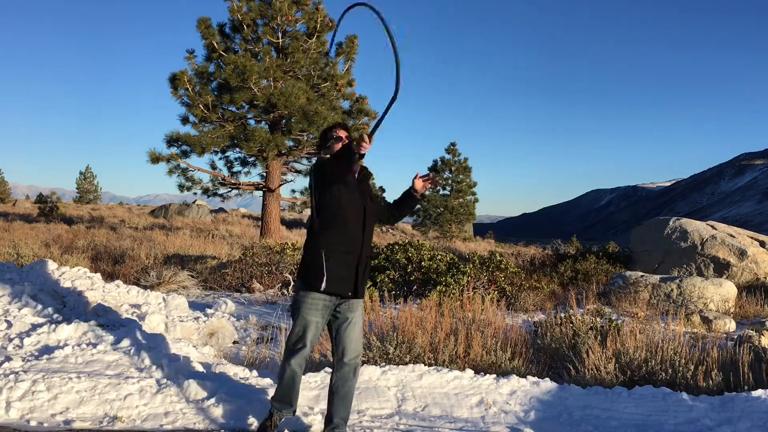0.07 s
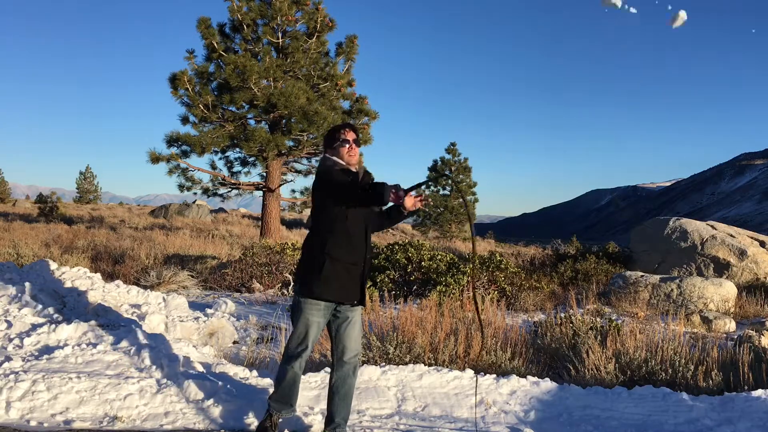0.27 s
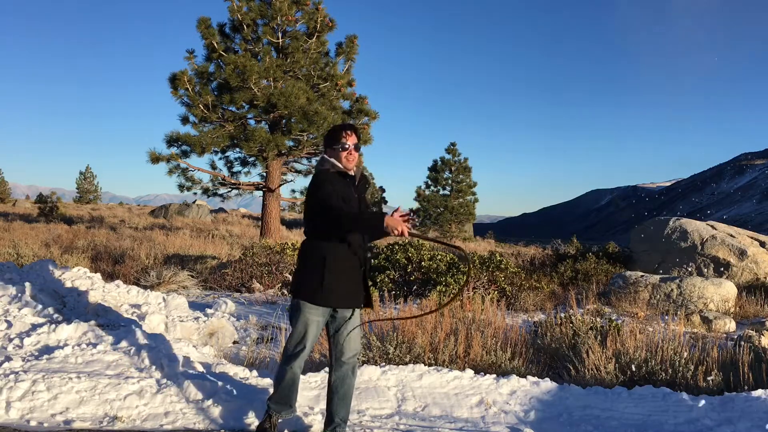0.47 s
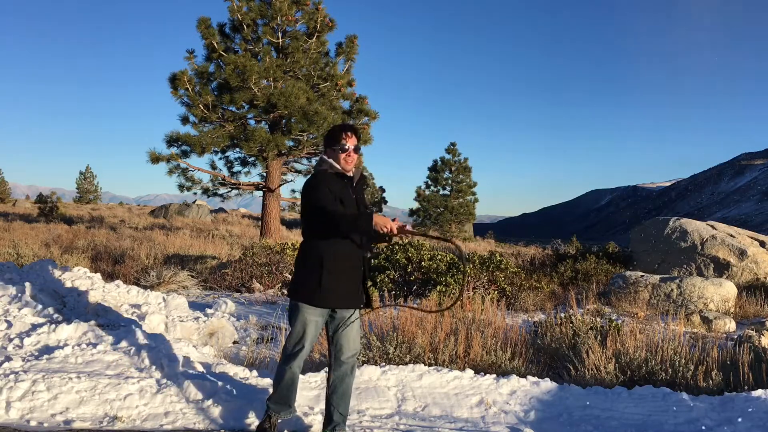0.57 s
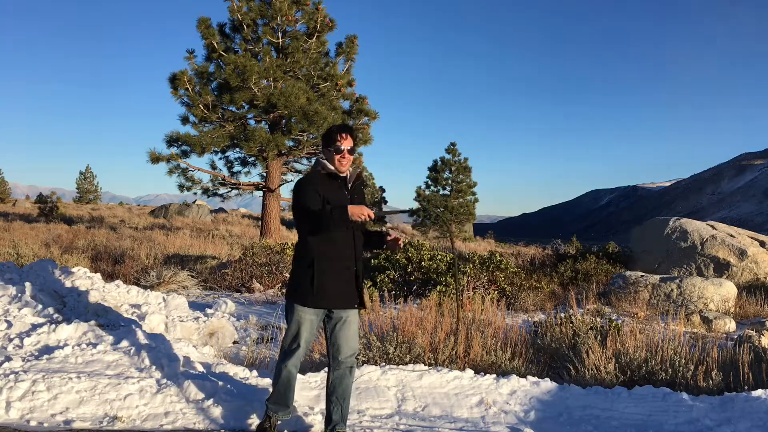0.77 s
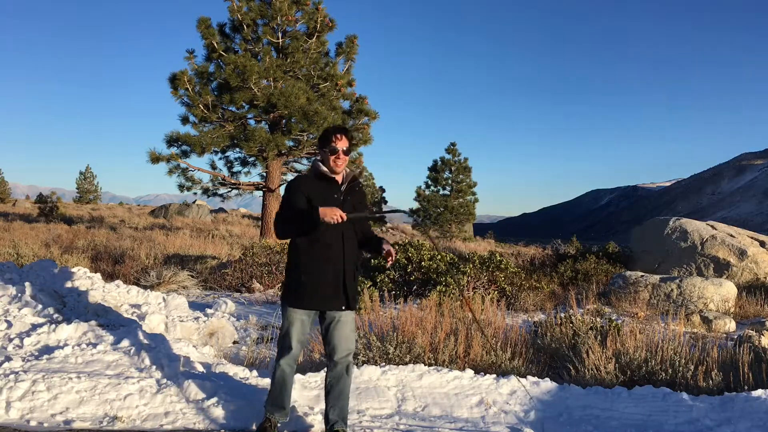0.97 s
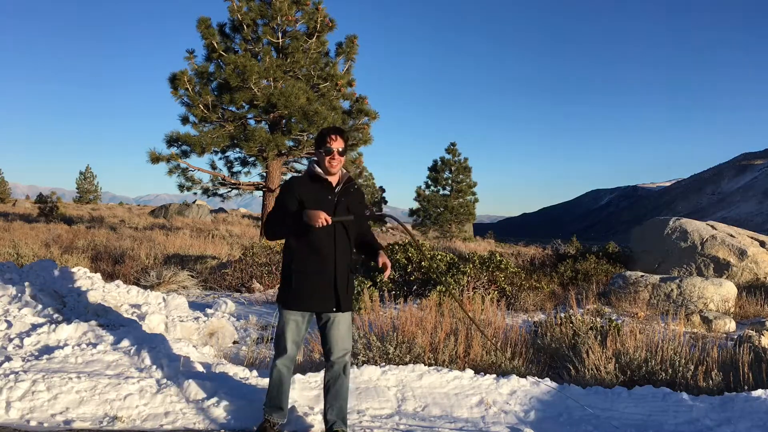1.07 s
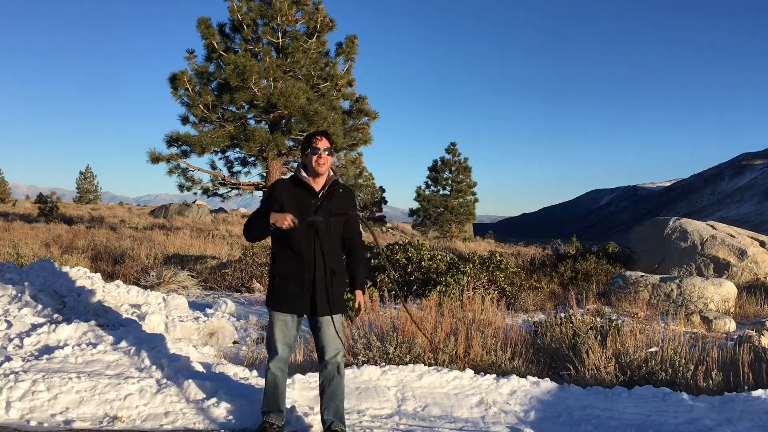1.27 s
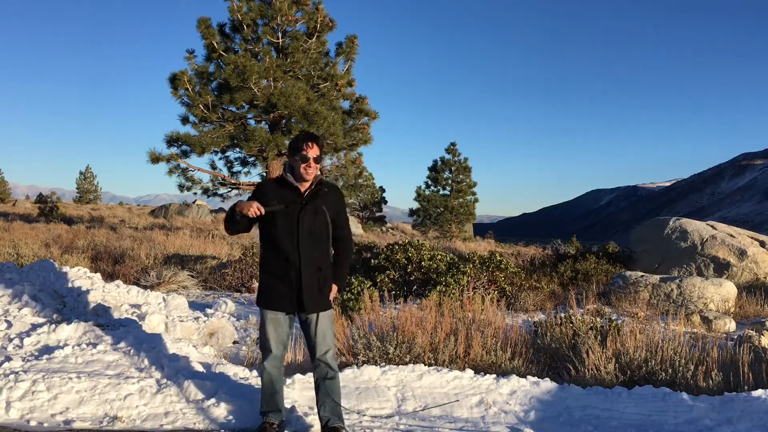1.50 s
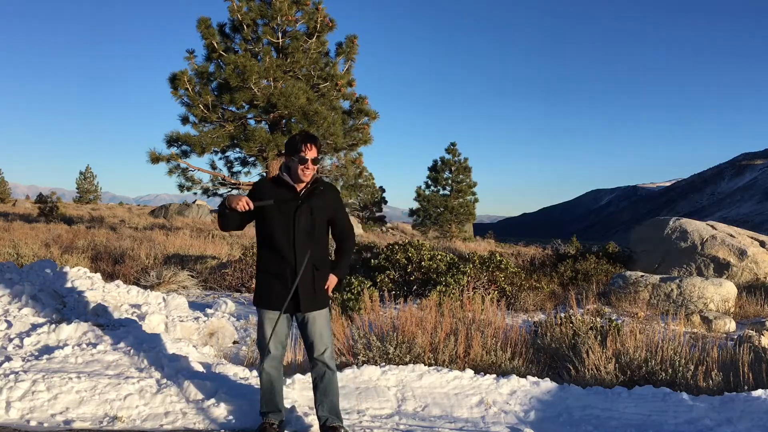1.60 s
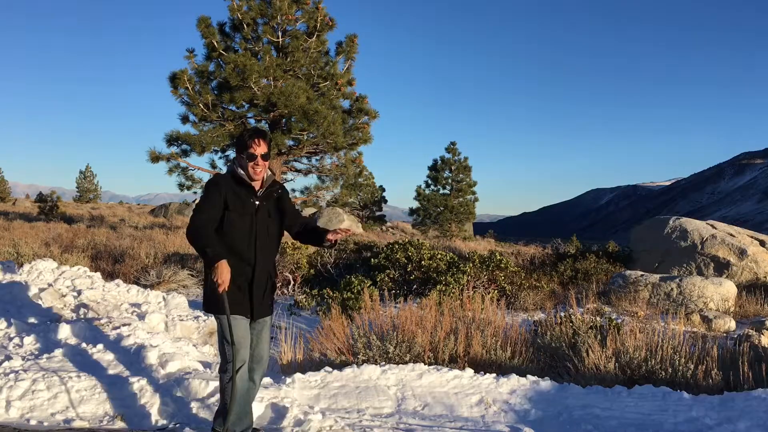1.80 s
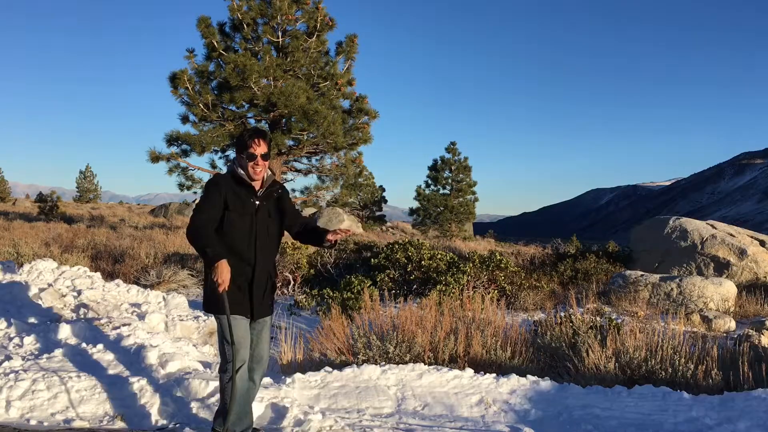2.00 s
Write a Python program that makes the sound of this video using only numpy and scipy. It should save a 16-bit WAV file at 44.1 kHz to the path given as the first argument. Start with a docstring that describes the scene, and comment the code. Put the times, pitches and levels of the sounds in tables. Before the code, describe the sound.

A whip swishes and gives one sharp, loud crack close to the microphone. The slack cord then taps and brushes lightly against a coat and the snowy ground, over faint outdoor hiss and wind rumble.

```python
"""Open snowy country, one microphone close to a whip, wind rumble and hiss throughout. The swung cord sheds
vortices and whistles upward; at 0.22 s it cracks in two quick pressure swings, echoed a few milliseconds later,
then whistles down as the tip slows. The slack cord taps and brushes coat and ground, hardest near 1.7 s. At
1.84 s the sound dips to silence and returns muffled, with low thumps."""
import sys
import numpy as np
from scipy import signal
from scipy.io import wavfile
from scipy.ndimage import map_coordinates

SR = 44100
rng = np.random.default_rng(int(sys.argv[2]) if len(sys.argv) > 2 else 0)


def to_wav(s):
    """Save 16-bit WAV."""
    ch = np.atleast_2d(s).T  # columns
    pcm = np.round(np.clip(ch, -1, 1) * 32767)  # PCM
    wavfile.write(sys.argv[1], SR, pcm.astype(np.int16))


N = 90404

# pressure swings of the crack, the last one its echo, one cycle each: start_s, length_ms, level_db,
# fade_over_cycle_db
CRACK_SHOCKS = [(.2218, .85, -11, -3), (.2227, 2.9, -7.5, 3), (.2277, 3.6, -9, 20)]
# low thud of air around the crack: time_s, level_db
THUD_LEVEL = [(.203, -60.5), (.21, -44), (.22, -43), (.229, -27.5), (.24, -37.5), (.246, -47), (.252, -40),
              (.262, -53), (.33, -70)]
# turbulent rush of the cord: time_s, level_db
RUSH_LEVEL = [(.05, -96), (.095, -72), (.125, -57.5), (.165, -69), (.2, -63), (.213, -46), (.2175, -44),
              (.2195, -24.5), (.2222, -19), (.226, -17), (.231, -25), (.236, -36.5), (.27, -50), (.31, -57),
              (.345, -66), (.38, -56), (.43, -65.5), (.6, -67), (.632, -55.5), (.645, -99)]
# its spectrum: frequency_hz, relative_density_db
RUSH_SPECTRUM = [(880, -42), (1500, -14), (2390, -0.5), (2640, -5.5), (3880, -10.5), (5220, -7.5),
                 (9650, -13.5), (16000, -19)]
# whistle of the wind-up swing: time_s, pitch_hz, relative_db
WINDUP_WHISTLE = [(.02, 484.6, -82), (.045, 529.4, -69), (.075, 571.6, -73.5), (.1, 728, -64),
                  (.118, 800, -56.5), (.135, 843, -54.5), (.155, 796, -55.5), (.165, 806, -68.5),
                  (.18, 755, -58), (.2, 626, -62)]
# whistle as the loop runs down the thinning cord: time_s, pitch_hz, relative_db
THROW_WHISTLE = [(.18, 170, -64), (.192, 240, -44), (.199, 290, -43), (.203, 450, -60), (.2065, 800, -41),
                 (.2125, 950, -42), (.2145, 1500, -36), (.217, 1850, -28), (.2185, 2400, -36),
                 (.2195, 3760, -21), (.2212, 3766, -38), (.2243, 4053, -17), (.2262, 3900, -33),
                 (.228, 3800, -28), (.233, 3500, -35), (.237, 3300, -52)]
# whistle as the tip slows after the crack: time_s, pitch_hz, relative_db
RECOIL_WHISTLE = [(.222, 2200, -43), (.228, 2300, -30), (.234, 2200, -39), (.237, 1950, -29),
                  (.241, 2100, -26), (.246, 1600, -32), (.251, 1300, -37), (.253, 1500, -46),
                  (.257, 1550, -38), (.27, 950, -46), (.28, 1000, -51), (.295, 795, -53), (.322, 722, -57),
                  (.332, 627, -76), (.35, 531, -58), (.37, 490, -72)]
# slack cord landing, relative levels in four registers: start_s, knock_db, thud_db, tick_db, fizz_db
CORD_TAPS = [(0.3543, -46, -55, -36, -51), (0.37, -58, -76, -44, -66), (0.379, -53.5, -64, -43, -76),
             (0.406, -64, -85, -53, -51), (.506, -78, -83, -66, -60), (0.599, -38, -47.5, -34.5, -51.5),
             (0.6024, -32, -41.5, -30.5, -60.5), (0.619, -41.5, -47, -44, -73), (0.629, -45, -51, -44, -77),
             (0.6528, -47, -64, -46, -54), (.658, -47.5, -60, -48, -60), (0.662, -57, -68, -62, -58),
             (0.6917, -49.5, -58.5, -49.5, -72), (0.7023, -60, -64, -66, -62),
             (0.8064, -62, -59.5, -46.5, -70), (0.85, -47.5, -63, -73, -82),
             (0.868, -67.5, -69, -59.5, -67), (1.039, -61, -70.5, -70, -65.5),
             (1.141, -54, -76, -54.5, -54.5), (1.2291, -46.5, -57.5, -46.5, -76.5),
             (1.2883, -41, -56.5, -49, -78), (1.327, -44.5, -56, -54.5, -69),
             (1.3978, -78, -77, -42.5, -68), (1.6731, -18.5, -36, -33.5, -55), (1.6789, -28, -42, -39, -67),
             (1.6845, -34, -57.5, -40, -61), (1.694, -40, -64, -46, -55.5), (1.697, -26.5, -48, -38, -55),
             (1.705, -43, -79, -44, -72), (1.7329, -53, -78, -46, -47.5), (1.7474, -65, -85, -42.5, -60),
             (1.9, -49.5, -55, -59, -95)]
# registers of a tap, in that order: low_hz, high_hz
REGISTER_BANDS = [(760, 1450), (170, 560), (2100, 4400), (4800, 14000)]
# how each register is struck: t60_s, gain_db, noise_share
REGISTER_STRIKES = [(0.015, 19, 0.42), (0.057, 31, 0.26), (0.015, 13.5, 0.81), (0.02, 21.5, 0.7)]
# soft low knocks: start_s, pitch_hz, level_db
LOW_THUMPS = [(1.863, 55, -41), (1.92, 50, -43), (1.94, 65, -41), (1.341, 150, -45)]
# spectrum of the outdoor hiss: frequency_hz, relative_density_db
HISS_SPECTRUM = [(18, -31), (30, -3), (64, -7), (404, -19.5), (449, -21), (1070, -23), (2170, -27),
                 (2900, -32.5), (3980, -32.5), (13000, -41), (16000, -45.5)]
# lower hiss and rustle: time_s, level_db
LOW_HISS_LEVEL = [(0, -64), (.14, -64), (.3, -60), (.56, -61.5), (.7, -65.5), (1.06, -67.5), (1.29, -63),
                  (1.4, -66), (1.65, -65.5), (1.72, -60), (1.82, -60), (1.85, -66), (1.91, -62.5),
                  (1.97, -68), (2.05, -68.5)]
# treble hiss: time_s, level_db
HIGH_HISS_LEVEL = [(0, -73), (.3, -84), (.5, -70), (.72, -79), (.9, -74), (1.08, -76), (1.2, -76),
                   (1.6, -75), (1.72, -71), (1.78, -67), (1.82, -68), (1.85, -83)]
# wind on the microphone: time_s, level_db
WIND_LEVEL = [(0.0, -56.5), (0.18, -59), (0.23, -32), (0.34, -66), (0.52, -54.5), (0.76, -62.5),
              (0.92, -55), (1.01, -61), (1.72, -56.5), (1.83, -66), (1.87, -36.5), (1.9, -60), (1.94, -41),
              (1.99, -70.5), (2.05, -51.5)]

TIME_S = np.arange(N) / SR


def whip_crack():
    """The tip's quick pressure swings and their echo, with a low thud of air and the cord's turbulent rush."""
    shocks = 0
    for start_s, length_ms, level_db, fade_db in CRACK_SHOCKS:
        progress = np.clip((TIME_S - start_s) / (length_ms / 1000), 0, 1)
        shocks -= from_db(level_db - fade_db * progress) * np.sin(2 * np.pi * progress)
    thud = gated_gain(THUD_LEVEL) * unit_rms(band(rng.standard_normal(N), 130, 620))
    rush = gated_gain(RUSH_LEVEL) * shaped_noise(RUSH_SPECTRUM, flicker_db=0)
    return shocks + thud + rush


def cord_whistle(path, octave_db, steady):
    """Shed vortices sound a tone and its octave; the larger `steady`, the less their wavering counts."""
    time_s, pitch_hz, _ = np.transpose(path)
    cycles = np.cumsum(np.exp(np.interp(TIME_S, time_s, np.log(pitch_hz)))) / SR
    waver_cycles = 2.2  # how long the tone keeps its phase
    tone = 0
    for harmonic, level_db in ((1, 0), (2, octave_db)):
        position = [harmonic * cycles / waver_cycles]
        real, imag = (map_coordinates(knots, position, order=3, mode="wrap")
                      for knots in rng.standard_normal((2, 4000)))
        amplitude = steady + real + 1j * imag
        tone += from_db(level_db) * np.real(amplitude * np.exp(2j * np.pi * harmonic * cycles))
    return tone * gated_gain(path)


def cord_taps():
    """The slack cord hits coat and ground: a click and a dying puff of noise in each register."""
    start_s, *registers_db = np.transpose(CORD_TAPS)
    taps = 0
    for levels_db, edges_hz, strike in zip(registers_db, REGISTER_BANDS, REGISTER_STRIKES):
        t60_s, gain_db, noise_share = strike
        clicks = np.zeros(N)
        clicks[(start_s * SR).astype(int)] = from_db(levels_db + gain_db)
        contact = noise_share * noise_puffs(clicks, t60_s) / 4 - (1 - noise_share) * 4 * clicks
        taps += band(band(contact, *edges_hz), *edges_hz)
    return taps


def cord_brushes(rate_per_s=70):
    """The settling cord brushes cloth: faint, bright puffs at random moments."""
    settling = (TIME_S > 0.24) & (TIME_S < 1.15)
    touches = (rng.random(N) < rate_per_s / SR) * settling
    strength = from_db(-69 + 3.2 * np.minimum(rng.exponential(1, N), 2))
    return band(noise_puffs(touches * strength, t60_s=0.018), 5000, 19000)


def low_thumps(t60_s=0.049):
    """Soft knocks, each a low sine that dies quickly."""
    thumps = 0
    for start_s, pitch_hz, level_db in LOW_THUMPS:
        age_s = np.maximum(TIME_S - start_s, 0)
        thumps -= from_db(level_db - 60 * age_s / t60_s) * np.sin(2 * np.pi * pitch_hz * age_s)
    return thumps


def outdoor_hiss(split_hz=3700):
    """Gently flickering hiss, its lower part and its treble swelling separately."""
    low = unit_rms(band(shaped_noise(HISS_SPECTRUM, flicker_db=1.2), 90, split_hz))
    high = unit_rms(band(shaped_noise(HISS_SPECTRUM, flicker_db=1.4), split_hz, 19000))
    return gain_curve(LOW_HISS_LEVEL) * low + gain_curve(HIGH_HISS_LEVEL) * high


def wind_rumble(edges_hz=(33.3, 78)):
    """Wind buffets the microphone with a lumpy rumble."""
    rumble = band(band(rng.standard_normal(N), *edges_hz), *edges_hz)
    return gain_curve(WIND_LEVEL) * unit_rms(rumble)


def noise_puffs(impulses, t60_s):
    """Each impulse starts a dying burst of white noise."""
    envelope = signal.lfilter([1], [1, -from_db(-60 / (t60_s * SR))], impulses + 1e-18)
    return envelope * rng.standard_normal(N)


def shaped_noise(spectrum, flicker_db):
    """Half-octave bands of noise that follow a spectrum and flicker mostly together; rms 1."""
    frequency_hz, density_db = np.transpose(spectrum)
    edges_hz = 28 * 2 ** np.arange(0, 9.6, 0.5)
    white = rng.standard_normal((2, N))
    common_drift = drift(rate_hz=14)
    noise = 0
    for k, (low_hz, high_hz) in enumerate(zip(edges_hz, edges_hz[1:])):
        centre_hz = np.sqrt(low_hz * high_hz)
        rolloff_db = density_db[0] - 12 * np.log2(frequency_hz[0] / centre_hz)
        level_db = np.interp(np.log(centre_hz), np.log(frequency_hz), density_db, left=rolloff_db)
        level_db += flicker_db * (common_drift + 0.16 * drift(rate_hz=29))
        noise += from_db(level_db) * band(white[k % 2], low_hz, high_hz)
    return unit_rms(noise)


def drift(rate_hz):
    """Smooth random curve with a spread of about 1."""
    return map_coordinates(rng.standard_normal(400), [TIME_S * rate_hz + 2], order=3)


def gain_curve(rows):
    """Gain per sample from a table with time_s first and decibels last."""
    time_s, *_, level_db = np.transpose(rows)
    return from_db(np.interp(TIME_S, time_s, level_db))


def gated_gain(rows, fade_s=0.02):
    """Gain curve that opens at the table's first row and fades to silence by its last."""
    fade_out = np.clip((rows[-1][0] - TIME_S) / fade_s, 0, 1)
    return gain_curve(rows) * (TIME_S > rows[0][0]) * fade_out


def band(x, low_hz, high_hz):
    """Gentle band-pass."""
    sos = signal.butter(2, [low_hz, min(high_hz, 0.45 * SR)], "band", fs=SR, output="sos")
    return signal.sosfilt(sos, x + 1e-18)


def cut_treble(x, stop_hz, depth_db):
    """Steep low-pass."""
    return signal.sosfilt(signal.cheby2(22, depth_db, stop_hz, fs=SR, output="sos"), x)


def from_db(db):
    """Decibels to gain."""
    return 10 ** (np.asarray(db) / 20)


def unit_rms(x):
    """Scale to rms 1."""
    return x / np.sqrt(np.mean(x ** 2) + 1e-20)


def scene():
    """The whip in front, hiss and wind behind, in mono."""
    swing = cord_whistle(WINDUP_WHISTLE, octave_db=0, steady=0.9)
    swing += cord_whistle(THROW_WHISTLE, octave_db=-17, steady=2.5)
    swing += cord_whistle(RECOIL_WHISTLE, octave_db=-16, steady=1.3)
    whip = swing + whip_crack() + cord_taps() + cord_brushes()
    return (whip + low_thumps() + outdoor_hiss() + wind_rumble())[None]


def record(dry):
    """The microphone rounds peaks and trims bass and top; the sound dips out and returns muffled."""
    overload, low_cut_hz = 1.2, 40
    dip_s, fade_out_s, fade_in_s = 1.836, 0.021, 0.022
    rounded = overload * np.tanh(dry / overload)
    clear = signal.sosfilt(signal.butter(2, low_cut_hz, "high", fs=SR, output="sos"), rounded)
    muffled = cut_treble(clear, stop_hz=5750, depth_db=60)
    before_dip = clear * np.clip((dip_s - TIME_S) / fade_out_s, 0, 1)
    after_dip = muffled * np.clip((TIME_S - dip_s) / fade_in_s, 0, 1)
    return cut_treble(before_dip + after_dip, stop_hz=16400, depth_db=70)


dry = scene()
out = record(dry)
to_wav(out)
```